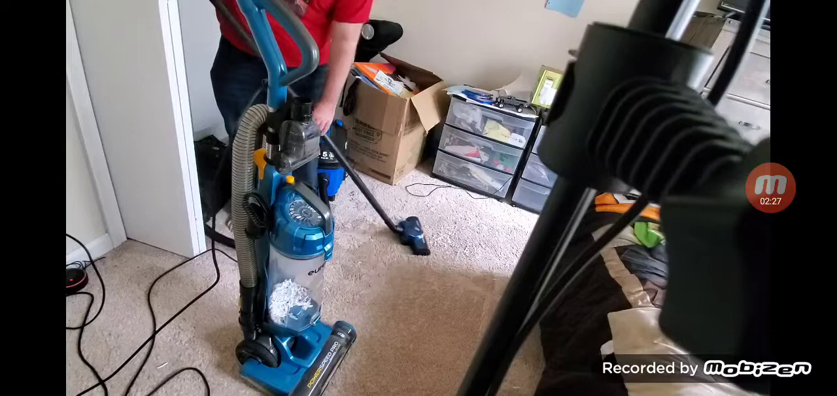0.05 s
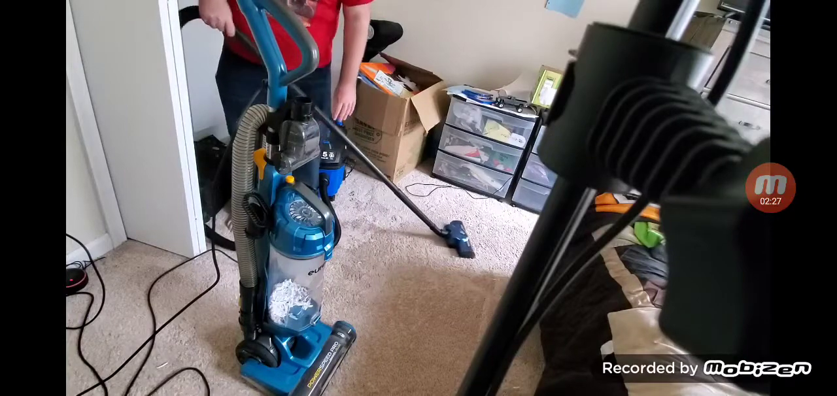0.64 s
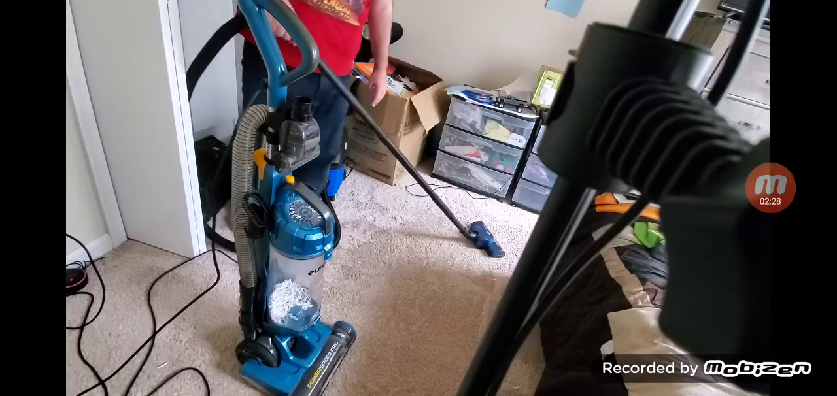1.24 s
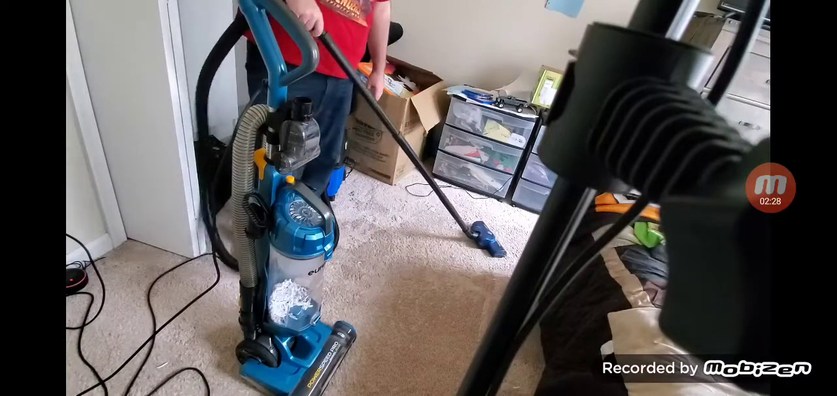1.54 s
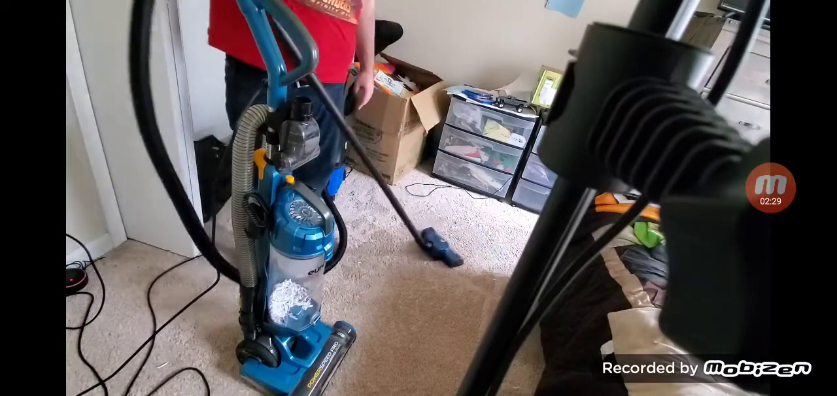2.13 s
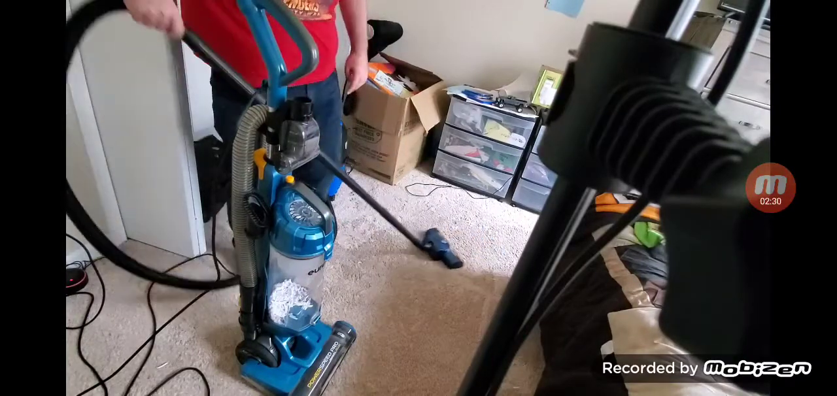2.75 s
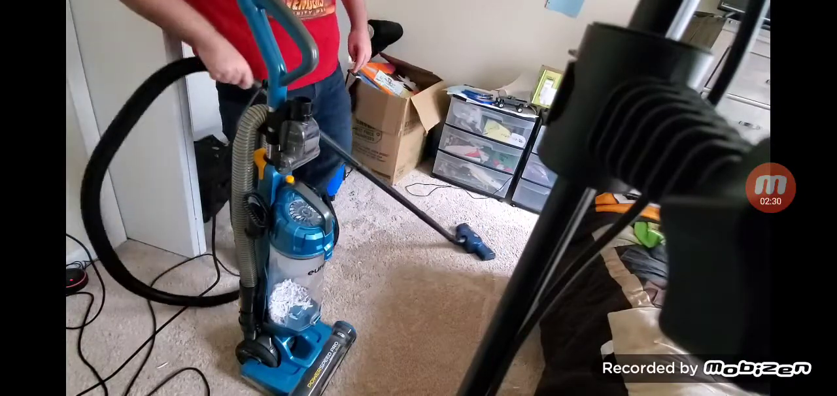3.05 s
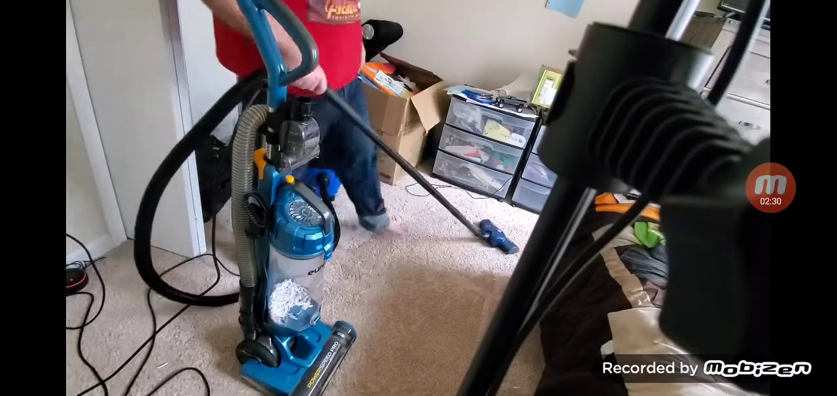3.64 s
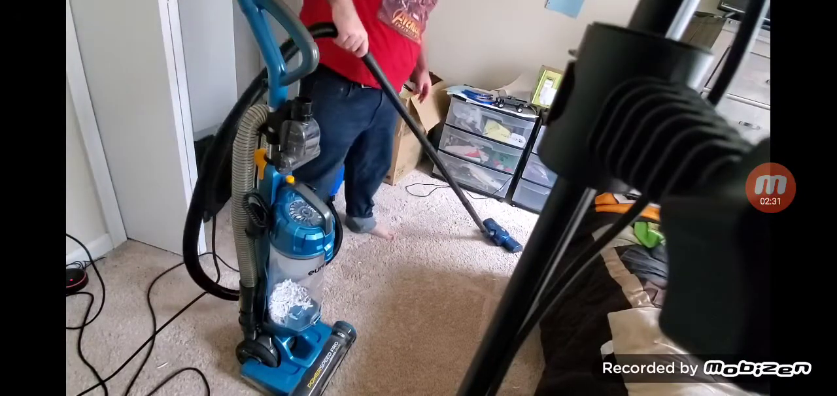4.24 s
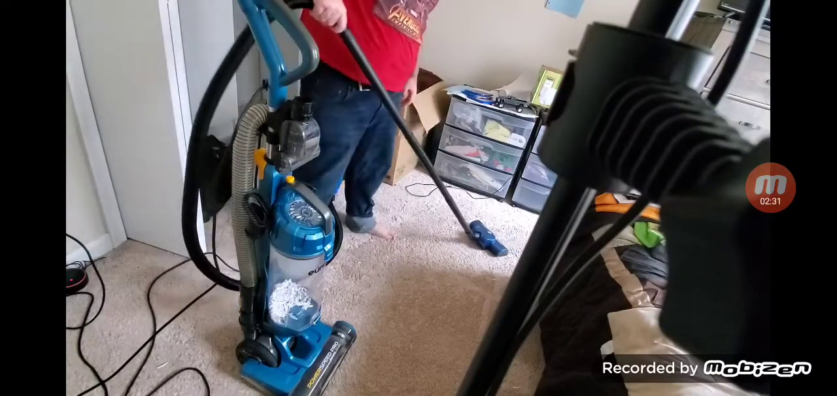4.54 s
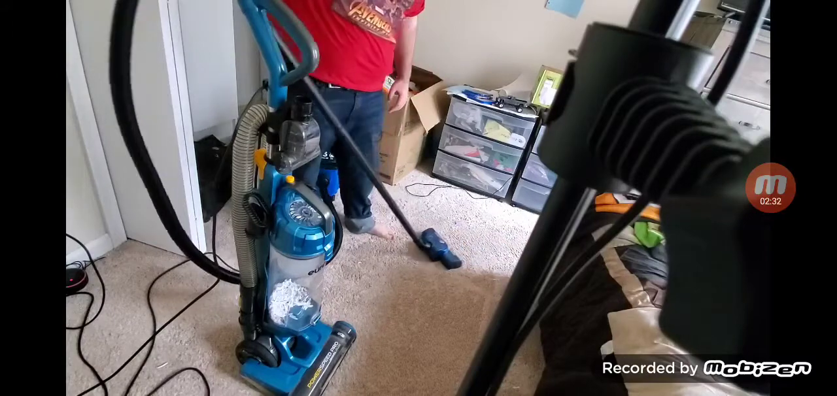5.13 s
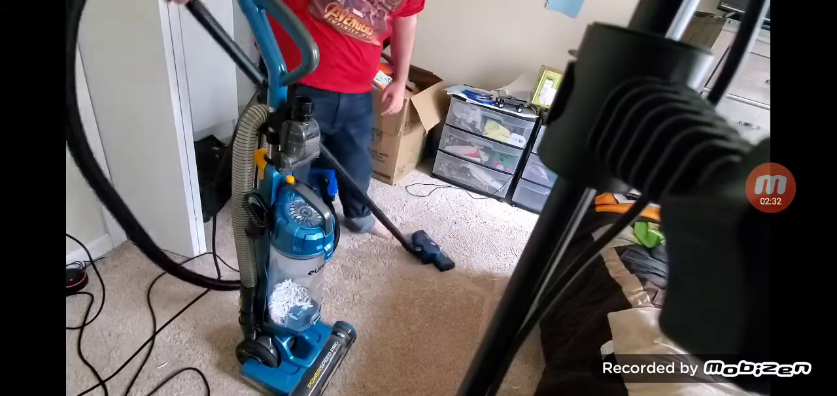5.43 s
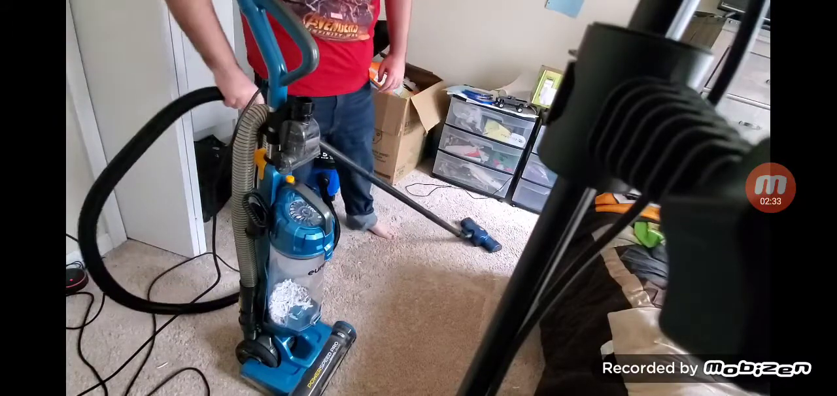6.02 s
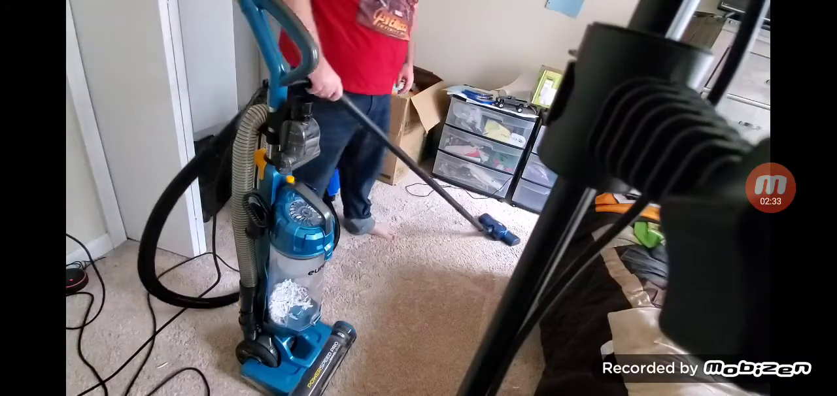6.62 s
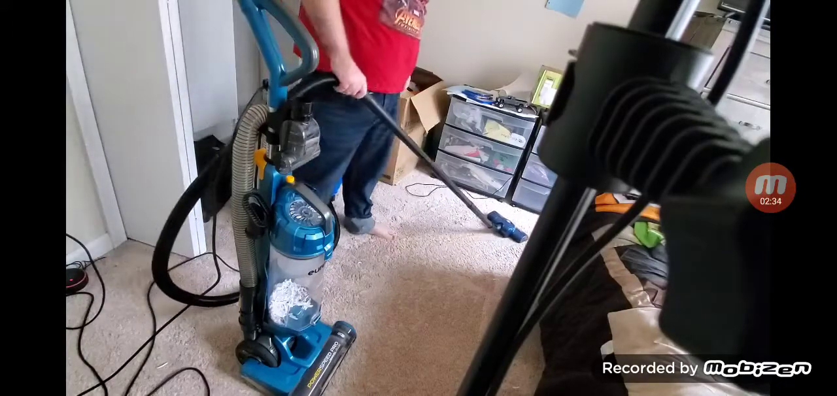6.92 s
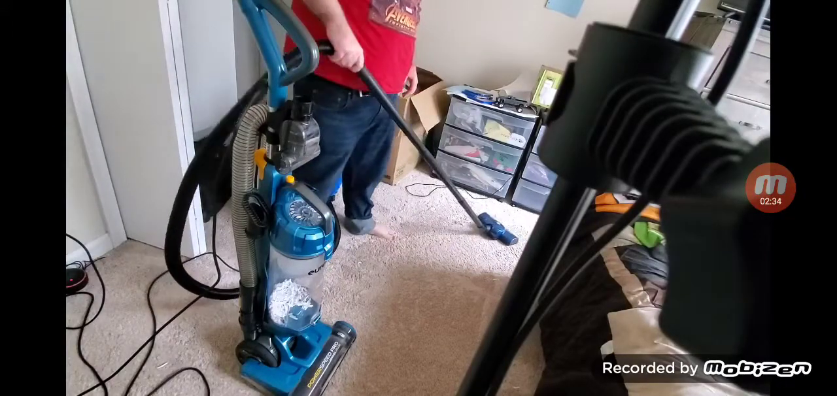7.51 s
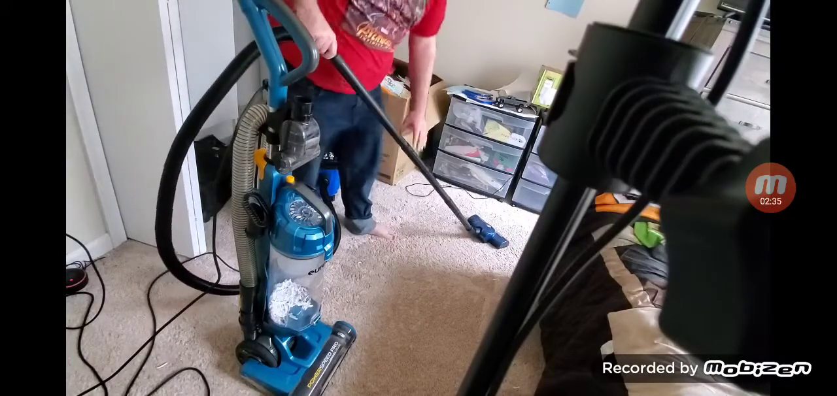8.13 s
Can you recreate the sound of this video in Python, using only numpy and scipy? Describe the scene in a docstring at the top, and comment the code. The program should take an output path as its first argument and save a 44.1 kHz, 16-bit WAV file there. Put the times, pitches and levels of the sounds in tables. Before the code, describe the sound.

An upright vacuum cleaner hums and whines steadily, its hose howling and nozzle whistling with each stroke as paper shreds patter up the tube.

```python
"""An upright vacuum cleaner works over shredded paper in a carpeted bedroom.
From the start its motor hums and whines over a rush of air. With each push of the wand the flexing
hose howls downward and the nozzle whistles high; on the pull the howl climbs back. Shreds patter and
tick up the tube, and now and then exhaust gusts hit the nearby phone and make its limiter duck.
The machine drops back for a second near 3 s; a fourth push is just beginning at the end."""
import sys
import numpy as np
from scipy import signal
from scipy.fft import rfft, irfft
from scipy.io import wavfile
from scipy.ndimage import uniform_filter1d, map_coordinates

SR = 44100
rng = np.random.default_rng(int(sys.argv[2]) if len(sys.argv) > 2 else 0)


def wav_out(sig):
    """Save sig, one row per channel (or a flat mono array), as 16-bit PCM at SR to the path in sys.argv[1]."""
    wavfile.write(sys.argv[1], SR, np.round(np.clip(np.atleast_2d(sig).T, -1, 1) * 32767).astype(np.int16))


N = 364707
TIME = np.arange(N) / SR
FREQ = np.fft.rfftfreq(N, 1 / SR)

WHISTLE_REST_HZ = 10950  # nozzle lifted off the carpet
SHREDS_DB = -33.5  # patter at the average pickup of paper


def motor(hum_db, rush_db, shaft_hz=294.5, wander=0.00035, hum_flutter_db=.5, line_flutter_db=1.76):
    """The shaft's imbalance hums; its multiples drone and whine in the airflow; the housing rings."""
    # narrow rings of the housing: pitch_hz, width_hz, level_db (against the rush)
    housing_rings = [(818, 12, -24), (949, 16, -18.5), (1660, 8, -20.5), (1717, 8, -25), (3390, 29, -33),
                     (3640, 7, -21)]
    # the motor's drone: shaft_multiple, level_db (against the rush)
    drone_lines = [(3, -17.5), (7, -16.5)]
    # the hum's octave: shaft_multiple, trim_db
    octave_lines = [(2, 1.5)]
    # fader ride on that octave: time_s, level_db
    octave_ride = [(0.0, -32.5), (1.43, -42), (1.98, -28), (3.31, -43), (4.14, -33.5), (7.28, -32),
                   (8.25, -38.5), (8.27, -44)]
    # the fan's whine: shaft_multiple, trim_db
    whine_lines = [(12, -1.5)]
    # fader ride on that whine: time_s, level_db
    whine_ride = [(0.0, -31), (0.32, -26), (0.69, -31), (0.71, -29), (0.87, -34), (0.94, -28), (2.19, -37),
                  (2.85, -31), (2.88, -34), (3.94, -44), (4.17, -27), (5.04, -23.5), (5.99, -27.5),
                  (7.51, -23), (7.56, -29.5), (8.27, -27)]
    sag_hz = 1.105 * swell(0.099, 1.398)  # the motor starts out a little slow
    shaft = phase_of(shaft_hz * (1 + wander * drift(9)) - sag_hz)

    def lines(table):
        """Multiples of the shaft rate, each with its own flutter."""
        return sum(unit(np.sin(k * shaft) * undb(line_flutter_db * drift(22))) * undb(db)
                   for k, db in table)

    hum = unit(np.sin(shaft)) * undb(hum_db + hum_flutter_db * drift(16))
    rings = sum(air_tone(hz, width_hz) * undb(db) for hz, width_hz, db in housing_rings)
    octave = lines(octave_lines) * undb(ride(octave_ride))
    drone = (lines(drone_lines) + rings) * undb(rush_db)
    whine = lines(whine_lines) * undb(ride(whine_ride))
    return hum + octave + drone + whine


def airflow(rush_db, hiss_db, surge_db=0.94, hiss_surge_db=0.9):
    """The fan's broad rush through the ducts and the nozzle's hiss, both surging with turbulence."""
    # tone of the air through fan and exhaust: frequency_hz, level_db
    rush_eq = [(30, -52), (135, -33.5), (210, -24.5), (300, -8.5), (445, -8.5), (490, -1), (900, 3),
               (1500, -0.5), (2750, -3.5), (3550, -1), (3950, -6.5), (4400, -2), (5500, -9.5),
               (12000, -24.5)]
    # cavities of dust cup and ducts: centre_hz, width_hz, lift_db
    cavities = [(492, 14, 5), (997, 81, -7.5), (1027, 31, 7.5), (1390, 58, 3), (1610, 79, -1.5),
                (1646, 53, 7), (1720, 29, -2), (2016, 140, 7.5), (3300, 690, 4.5)]
    # tone of the air torn at the nozzle's lip: frequency_hz, level_db
    hiss_eq = [(1500, -32), (4000, 0.5), (6500, 3), (7300, 0), (8400, 3), (9250, -6), (10200, 7),
               (11500, 4), (12600, -1), (14000, 2.5)]
    rush = colour(noise(), rush_eq, cavities) * undb(rush_db)
    hiss = colour(noise(), hiss_eq) * undb(hiss_db - hiss_surge_db * drift(30))
    return (rush + hiss) * undb(surge_db * drift(25))


def lulls(drop_s=.018, recover_s=.22, hum_share=0.29):
    """Level changes (dB) of rush and hum: a quick drop, a low spell, a slower recovery."""
    # the hum takes an extra dip as each lull begins: start_s, end_s, rush_change_db, dip_db, dip_s
    low_spells = [(0.565, 0.824, -1.5, -3, 0.14), (2.87, 4.0, -4.5, -12, .12), (7.52, 7.852, -2.5, -8, .17)]
    lull_db = hum_dip_db = 0
    for start, end, change_db, dip_db, dip_s in low_spells:
        lull_db += change_db * (ramp(start, drop_s) - ramp(end, recover_s))
        hum_dip_db += dip_db * swell(start + dip_s / 2, dip_s)
    return lull_db, hum_dip_db + hum_share * lull_db


def wand_strokes(press_s=.13, lift_db=6, lift_swell_s=0.25, spring_s=.55, pull_db=(-46, -32)):
    """Howl Hz, whistle Hz and dB: a push bends the hose and presses the nozzle; a pull frees both."""
    # forward pushes: start_s, end_s, howl_from_hz, howl_to_hz, whistle_top_hz, whistle_db, lift_s
    pushes = [(0.03, 1.905, 1234, 510, 13970, -30, .08), (2.62, 4.5, 1020, 506.7, 13980, -29.5, 0.19),
              (5.56, 7.53, 1028, 523, 13970, -27, 0.17), (8.0, 8.9, 843, 889, 11800, -22.5, .1)]
    controls = np.zeros((3, N))
    for push, following in zip(pushes, pushes[1:] + [None]):
        start, end, from_hz, to_hz, top_hz, push_db, lift_s = push
        left_s = np.maximum(end - TIME, 0)
        pressed = ramp(start, press_s) * (1 - np.exp(-left_s / lift_s))
        howl_hz = from_hz * (to_hz / from_hz) ** ramp(start, end - start)
        whistle_hz = WHISTLE_REST_HZ + (top_hz - WHISTLE_REST_HZ) * pressed
        whistle_db = push_db + lift_db * np.exp(-left_s / lift_swell_s)  # grows as the nozzle lifts
        begun = (TIME >= start) | (push is pushes[0])
        controls = np.where(begun, [howl_hz, whistle_hz, whistle_db], controls)
        if following:  # pull back while the hose springs to the next push's pitch
            pull_s, next_hz = following[0] - end, following[2]
            pulled = ramp(end, pull_s)
            sprung = np.expm1(-pulled * pull_s / spring_s) / np.expm1(-pull_s / spring_s)
            howl_hz = to_hz + (next_hz - to_hz) * sprung
            whistle_hz = np.full(N, WHISTLE_REST_HZ)
            whistle_db = np.interp(pulled, [0, 1], pull_db)
            controls = np.where(TIME >= end, [howl_hz, whistle_hz, whistle_db], controls)
    return uniform_filter1d(controls, size=SR // 40)


def hose(hz, rush_db, breath_db=-6.5, octave_db=-10):
    """Air howls over the hose's ribs: a hollow pitch and its octave, breathier in a harder rush."""
    # spells in which the howl catches: middle_s, length_s, level_db
    spells = [(.33, .35, -32), (1.35, .6, -30.5), (1.977, .3, -25), (2.35, .6, -29.5), (3.253, 0.57, -31),
              (3.85, 1.0, -27.5), (4.66, 0.43, -27), (4.95, 0.35, -27), (5.52, .3, -27.5),
              (6.003, 0.29, -25.5), (7.27, .65, -26), (7.72, .36, -29.5), (8.02, .42, -25)]
    breath = air_tone(hz, width_hz=220) * undb(breath_db + rush_db - rush_db.mean())
    howl = unit(air_tone(hz, width_hz=34) + breath)
    octave = air_tone(2 * hz, width_hz=70) * undb(octave_db)
    envelope = sum(undb(db) * swell(s, length) for s, length, db in spells)
    return bedroom((howl + octave) * envelope, wet_db=-7)


def nozzle(hz, db, shreds_db, waver_hz=40, pressed_waver=0.033, jolt=0.16, quench=0.29,
           flutter_db=1.5, breath_db=-7):
    """The gap to the carpet whistles, thin and breathy; passing shreds jolt its pitch and weaken it."""
    # the whistle sags as the nozzle rides over paper: middle_s, length_s, change_hz, change_db
    bumps = [(.47, 0.3, -1400, 0), (.9, .4, -1500, -3), (3.85, 0.196, -450, -2), (6.103, 0.34, -950, 1),
             (7.015, 0.48, -380, 0)]
    spread_hz = waver_hz + pressed_waver * (hz - WHISTLE_REST_HZ)
    for s, length, change_hz, change_db in bumps:
        bump = swell(s, length)
        hz, db = hz + change_hz * bump, db + change_db * bump
    busy_db = shreds_db - SHREDS_DB
    hz = hz + spread_hz * undb(jolt * busy_db) * (drift(25) + drift(110))
    whistle = unit(air_tone(hz, width_hz=280) + undb(breath_db) * air_tone(hz, width_hz=860))
    level_db = db - quench * np.maximum(busy_db, 0) + flutter_db * drift(25)
    return bedroom(whistle * undb(level_db), wet_db=-15)


def pickup():
    """How much paper the nozzle takes up, in dB around its average."""
    # rise and fall of the intake: time_s, level_db
    intake = [(0.0, -35), (0.34, -31), (0.97, -27), (2.07, -29.5), (2.74, -27.5), (3.09, -30), (3.11, -29),
              (3.43, -37), (4.77, -27), (4.88, -32), (5.27, -29.5), (6.1, -32), (8.08, -28), (8.27, -28.5)]
    # a wad briefly stops the nozzle, then shoots through: middle_s, length_s, change_db
    wad = [(3.055, 0.058, -7), (3.113, 0.037, -1)]
    pickup_db = ride(intake) + sum(db * swell(s, length) for s, length, db in wad)
    return pickup_db - pickup_db.mean()


def paper(shreds_db, per_second=350, size_spread_db=4, shred_s=0.00084, scrap_s=0.007, scrap_width=0.3):
    """Small shreds patter in the plastic tube; larger scraps give single short ticks."""
    # larger scraps striking the tube: start_s, dry_peak_db, ring_hz
    scraps = [(.719, -18, 10300), (.773, -9, 6900), (.874, -10, 10400), (0.883, -5, 11200),
              (2.331, -6, 8140), (2.489, -12, 5180), (2.654, -17, 7500), (3.096, -10, 8380),
              (3.281, -12, 7480), (4.697, -9, 7000), (7.649, -9, 5100)]
    tube_eq = [(1000, -14.5), (4500, -17), (8000, 4), (9300, -3), (10800, 2), (14000, -19)]
    t = TIME[:2048]
    sizes = undb(size_spread_db * np.minimum(rng.exponential(size=N), 4))
    hits = (rng.random(N) < per_second / SR) * sizes
    patter = noise() * signal.fftconvolve(hits, np.exp(-t / shred_s))[:N]
    ticks = colour(patter, tube_eq) * undb(shreds_db)
    for s, db, hz in scraps:
        tube = signal.iirpeak(hz, 1 / scrap_width, fs=SR)
        tick = signal.lfilter(*tube, rng.standard_normal(len(t)) * np.exp(-t / scrap_s))
        start = int(s * SR)
        ticks[start:start + len(t)] += tick * undb(db) / np.abs(tick).max()
    return bedroom(ticks, wet_db=0)


def scuffs(width_hz=1300):
    """Brief bands of hiss as the nozzle drags over carpet and paper."""
    # drags over the pile: middle_s, length_s, centre_hz, level_db
    drags = [(1.043, 0.4, 8100, -34), (2.496, 0.048, 5240, -26), (2.598, 0.1, 5360, -34),
             (2.976, 0.1, 4500, -26), (4.55, 0.091, 5230, -33), (5.252, 0.98, 7020, -35),
             (7.64, 0.07, 5200, -32)]
    return sum(air_tone(hz, width_hz) * swell(s, length) * undb(db) for s, length, hz, db in drags)


def singing(rush_db, pitch_hz=2588, below_rush_db=18.5, swell_db=8, wander=0.00072, flutter_db=2.0):
    """A thin, wavering tone beside the shaft's multiples that swells once, early on."""
    phase = phase_of(pitch_hz * (1 + wander * drift(12)))
    tone = unit(np.sin(phase) * undb(flutter_db * drift(14)))
    return tone * undb(rush_db - below_rush_db + swell_db * swell(0.38, 0.6))


def exhaust(lull_db, calm_db=-34, stir_db=-28, stir_s=.45):
    """A draught rumbles on the microphone; each gust is a subsonic swell with a low flutter on top."""
    # gusts on the microphone: middle_s, length_s, pressure_db, flutter_db (against the pressure)
    gusts = [(0.588, .028, -1.5, -20), (0.654, 0.06, 2, -22), (0.814, 0.12, -5.5, -28),
             (0.883, 0.069, -4, -42), (1.542, .06, -5, -55), (2.34, 0.045, -3.5, -31),
             (2.455, 0.11, -6.5, -24), (2.883, 0.035, 0.5, -15), (2.942, 0.044, -1.5, -23),
             (4.477, 0.042, -1.5, -55), (4.593, 0.051, -4, -57), (4.706, 0.052, -2, -29),
             (5.845, 0.14, -6.5, -55), (6.198, 0.03, -3.5, -14), (6.302, 0.036, 0, -30),
             (6.668, 0.073, -7, -55), (7.031, 0.081, -8.5, -51.5), (7.547, 0.074, -5, -37),
             (7.682, 0.071, -4.5, -32), (7.83, 0.032, -11, -21)]
    rumble_eq = [(10, -10), (25, 13), (50, -4), (100, -43), (200, -63), (1000, -90)]
    flutter_eq = [(20, -9), (55, 15.5), (110, -18), (200, -16), (500, -45), (3000, -55)]
    stir_power = sum((undb(db + stir_db) * swell(s, stir_s)) ** 2 for s, _, db, _ in gusts)
    draught = np.sqrt(undb(calm_db + lull_db) ** 2 + stir_power)
    wind = colour(noise(), rumble_eq) * draught
    flutter = colour(noise(), flutter_eq)
    for s, length, db, flutter_db in gusts:
        wind += undb(db) * swell(s, length) * (1 + undb(flutter_db) * flutter)
    return wind


def bedroom(x, wet_db, t60_s=0.15):
    """Direct sound plus the short, dense tail of a small furnished room."""
    t = TIME[:SR // 4]
    tail = rng.standard_normal(len(t)) * undb(-60 * t / t60_s) * (t > .003)
    echo = signal.fftconvolve(x, tail / np.linalg.norm(tail))[:N]
    return (x + undb(wet_db) * echo) / np.hypot(1, undb(wet_db))


def air_tone(hz, width_hz):
    """A resonance blown by turbulence: a band of noise around a pitch; rms 1."""
    phase = phase_of(hz)
    return drift(width_hz) * np.cos(phase) + drift(width_hz) * np.sin(phase)


def colour(x, eq, peaks=()):
    """Shape a sound by an EQ curve (frequency_hz, level_db) and bell resonances; rms 1."""
    hz, db = np.transpose(eq)
    shape_db = np.interp(np.log(FREQ + 1), np.log(hz), db)
    for centre_hz, width_hz, lift_db in peaks:
        shape_db += lift_db / (1 + (2 * (FREQ - centre_hz) / width_hz) ** 2)
    return unit(irfft(rfft(x) * undb(shape_db), N))


def noise():
    """White noise."""
    return rng.standard_normal(N)


def drift(rate):
    """Smooth random motion with `rate` new values a second; rms 1."""
    steps = rng.standard_normal(N // 16)
    return unit(map_coordinates(steps, [TIME * rate], order=2, mode="wrap"))


def phase_of(hz):
    """Phase of a steady or moving pitch."""
    return 2 * np.pi * np.cumsum(hz * np.ones(N)) / SR


def swell(middle_s, length_s):
    """A smooth rise and fall, top 1."""
    return np.exp(-2 * np.minimum(2 * (TIME - middle_s) / length_s, 5) ** 2)


def ramp(start_s, length_s):
    """A straight rise from 0 to 1, then held."""
    return np.clip((TIME - start_s) / length_s, 0, 1)


def ride(points):
    """A fader ride: straight lines through (time_s, level_db) points."""
    return np.interp(TIME, *np.transpose(points))


def undb(db):
    """Decibels to gain."""
    return 10 ** (np.asarray(db) / 20)


def unit(x):
    """Scale to rms 1."""
    return x / np.sqrt(np.mean(x ** 2))


def scene():
    """Machine, wand, paper and exhaust as they reach one microphone."""
    lull_db, hum_change_db = lulls()
    rush_db, hum_db = -17.5 + lull_db, -35 + hum_change_db
    pickup_db = pickup()
    hiss_db = -25.5 + 0.82 * pickup_db
    shreds_db = SHREDS_DB + 1.52 * pickup_db  # the patter grows faster than the hiss
    howl_hz, whistle_hz, whistle_db = wand_strokes()
    machine = motor(hum_db, rush_db) + singing(rush_db) + airflow(rush_db, hiss_db)
    wand = hose(howl_hz, rush_db) + nozzle(whistle_hz, whistle_db + .7 * lull_db, shreds_db) + scuffs()
    mono = machine + wand + paper(shreds_db) + exhaust(lull_db)
    return np.array([mono, mono])


def record(dry, knee=0.56, follow_s=0.0053, low_cut_hz=105, ceiling=.66, top_hz=14200):
    """The phone's limiter ducks under the gusts; then deep bass is cut, peaks rounded, the top cut."""
    power = uniform_filter1d(dry ** 2, int(follow_s * SR), axis=-1)
    limited = dry / np.sqrt(1 + power / knee ** 2)
    wind_cut = signal.butter(4, low_cut_hz, "high", fs=SR, output="sos")
    thinned = signal.sosfilt(wind_cut, limited)
    rounded = thinned / (1 + (thinned / ceiling) ** 8) ** (1 / 8)
    top_cut = signal.ellip(12, .2, 80, top_hz, fs=SR, output="sos")
    return signal.sosfilt(top_cut, rounded)


dry = scene()
out = record(dry)
wav_out(out)
```